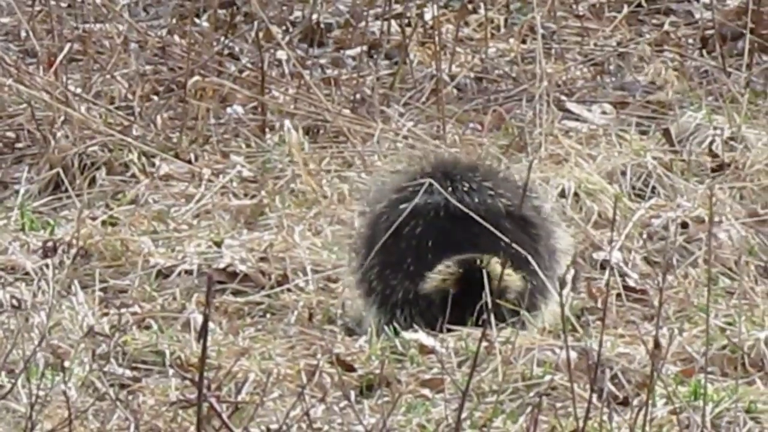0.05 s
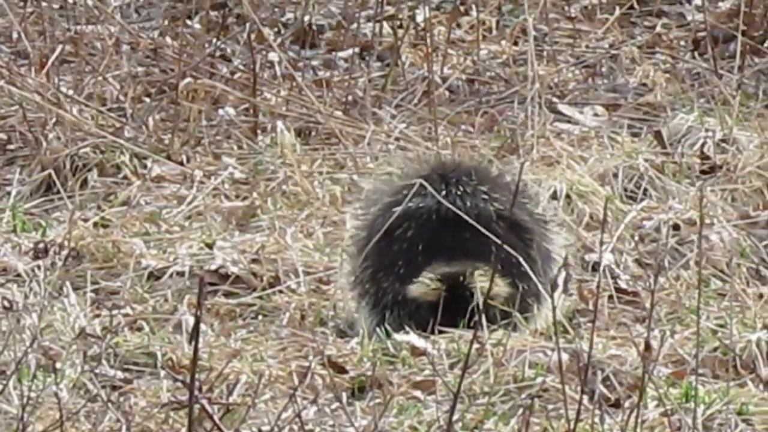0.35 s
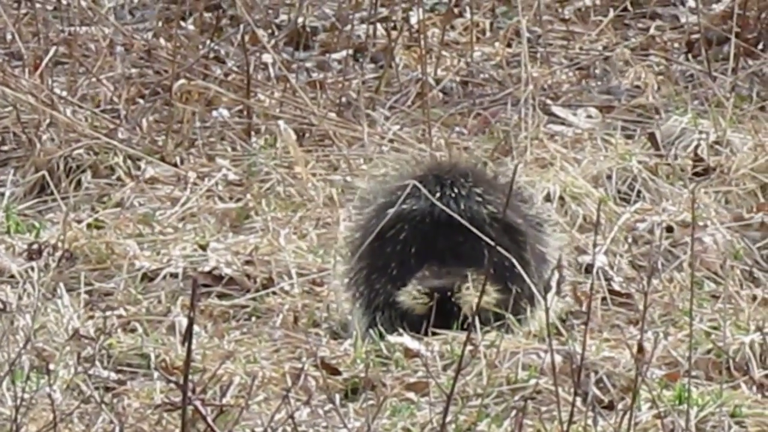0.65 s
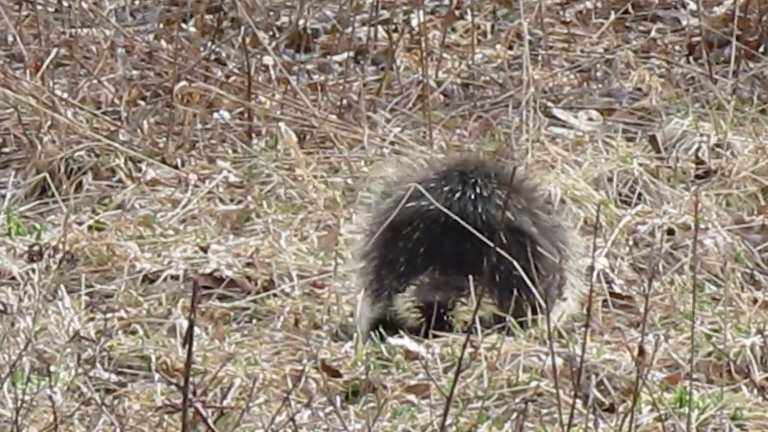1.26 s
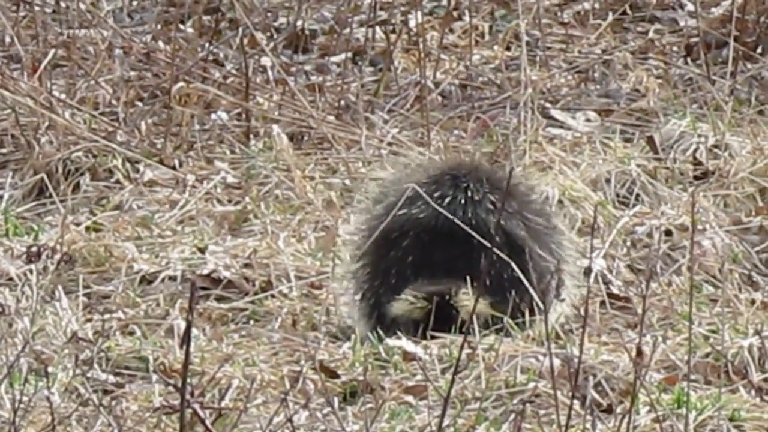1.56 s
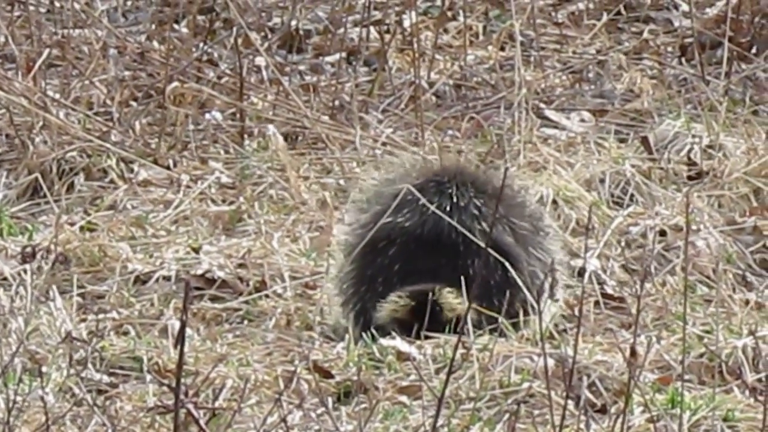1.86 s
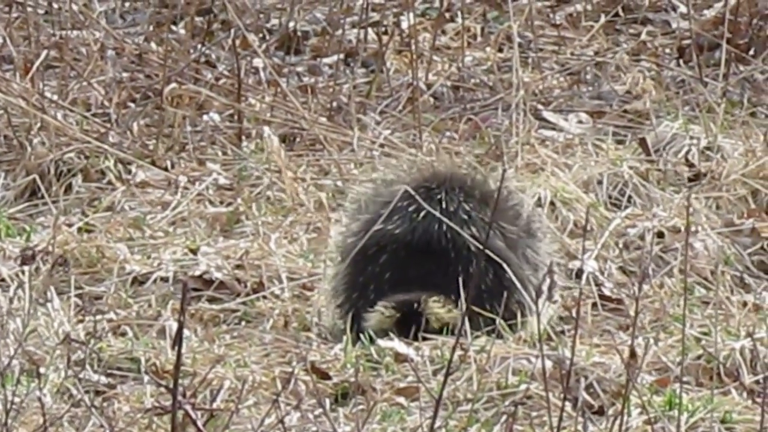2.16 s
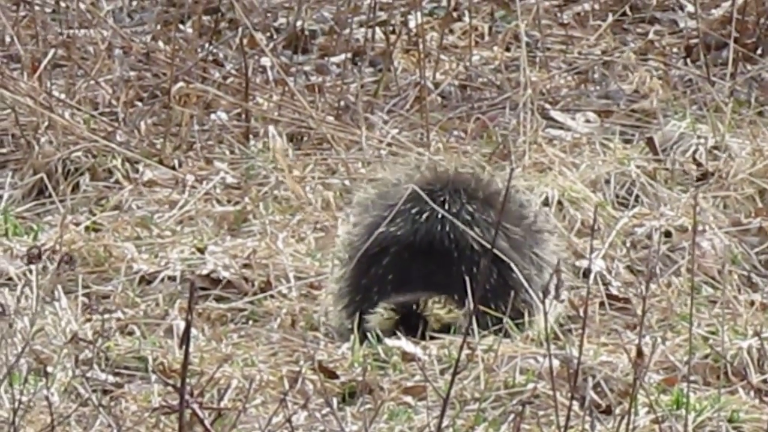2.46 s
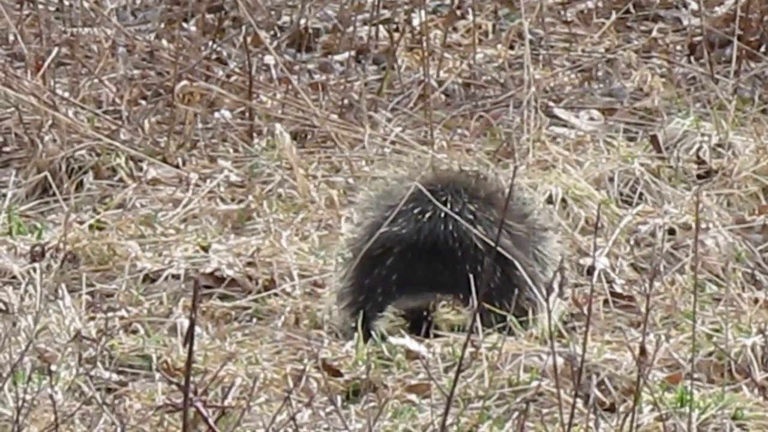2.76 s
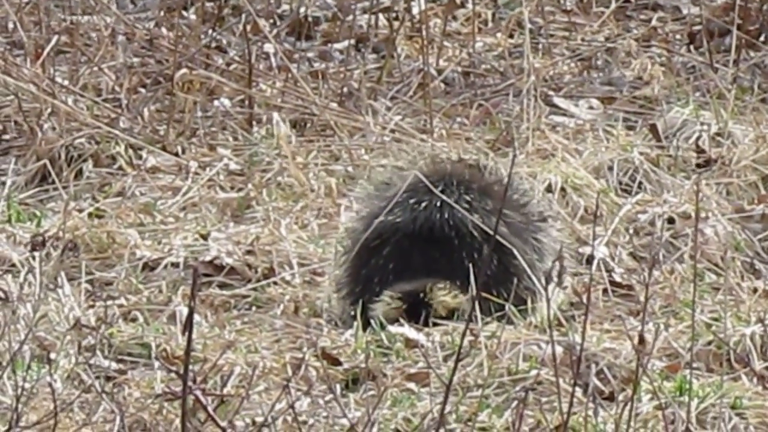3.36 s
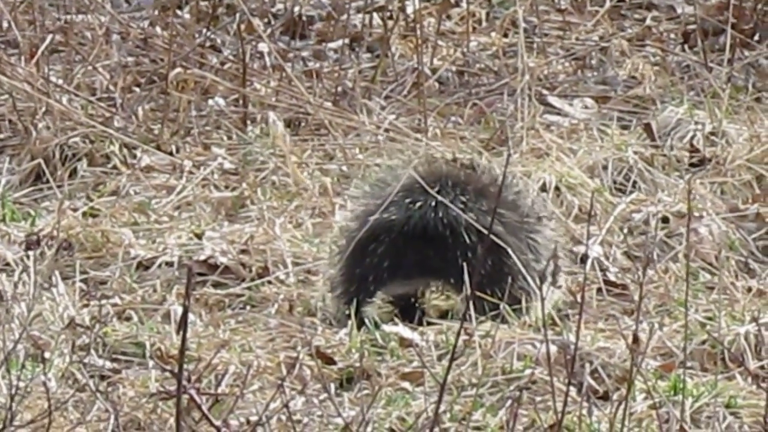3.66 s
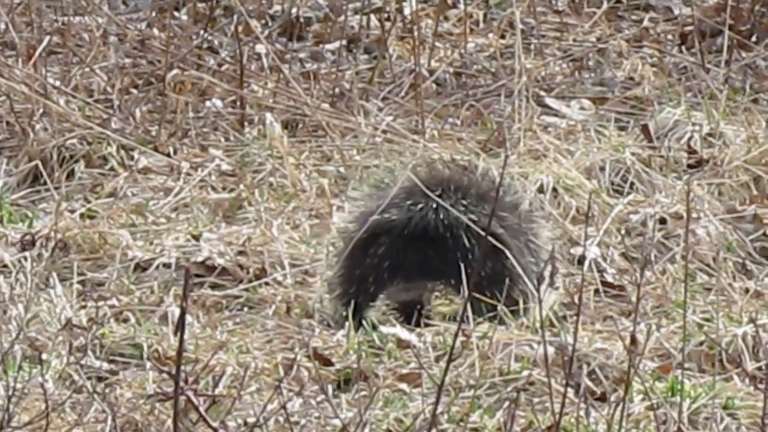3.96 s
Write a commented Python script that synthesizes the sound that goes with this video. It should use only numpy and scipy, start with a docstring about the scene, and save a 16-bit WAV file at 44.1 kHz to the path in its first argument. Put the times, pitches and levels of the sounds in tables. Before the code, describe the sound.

Thin, high bird chips repeat steadily outdoors, with soft hiss and a late low wind rumble.

```python
"""Bird chips in a dry spring meadow

A small bird gives six thin chips, each a fast downward whistle that echoes off trunks and scatters
in the brush and the wood. Behind it, far frog peeps merge into a shimmering band, a distant engine
drones and the air hisses softly; dry grass ticks as stalks snap. In the last third a breeze rises,
and its turbulent pressure buffets the two ports of the microphone."""
import sys
import numpy as np
from scipy import signal
from scipy.fft import rfft, irfft
from scipy.io import wavfile

SR = 44100
rng = np.random.default_rng(int(sys.argv[2]) if len(sys.argv) > 2 else 0)


def pcm_store(signal):
    """Save signal as 16-bit PCM."""
    levels = np.round(np.clip(np.atleast_2d(signal), -1, 1) * 32767)
    wavfile.write(sys.argv[1], SR, levels.astype(np.int16).T)


N = 176400
T = np.arange(N) / SR
FREQS = np.maximum(np.fft.rfftfreq(N, 1 / SR), 1)


def from_db(db):
    """Amplitude ratio: tenfold for every 20 dB."""
    return 10 ** (np.asarray(db) / 20)


def unit_rms(x):
    """Normalisation to unit mean power."""
    return x / np.sqrt(np.mean(x ** 2) + 1e-20)


def pan(db):
    """Interaural level difference: two gains, the left one db above the right."""
    return from_db(np.array([[db], [-db]]) / 2)


def in_time(rows, t=T):
    """Linear interpolation of each column against the times in the first."""
    times, *columns = np.transpose(rows)
    return [np.interp(t, times, column) for column in columns]


def spectrum(points):
    """Linear interpolation on a logarithmic frequency axis."""
    hz, value = np.transpose(points)
    return np.interp(np.log(FREQS), np.log(hz), value)


def coloured_noise(colour, coherence=0):
    """Partly coherent stereo noise of unit power: a common part plus an antiphase part."""
    mid, side = rfft(rng.standard_normal((2, N))) * from_db(spectrum(colour))
    stereo = np.sqrt(1 + coherence) * mid + np.sqrt(1 - coherence) * side * [[1], [-1]]
    return unit_rms(irfft(stereo, N))


def drift(corner_hz):
    """Slow random fluctuation: low-passed noise of unit power."""
    return unit_rms(irfft(rfft(rng.standard_normal(N)) / (1 + (FREQS / corner_hz) ** 2), N))


def resonance(x, hz, width_hz):
    """A damped two-pole resonator with unit gain at its peak."""
    radius = np.exp(-np.pi * width_hz / SR)
    feedforward = np.array([1, 0, -1]) * (1 - radius ** 2) / 2
    feedback = [1, -2 * radius * np.cos(2 * np.pi * hz / SR), radius ** 2]
    return signal.lfilter(feedforward, feedback, x + 1e-18)


# Still air. Each row: frequency in Hz, relative spectral density in dB.
AIR_COLOUR = [(20, 12), (45, 16), (110, 16), (190, 13.5), (300, 7.5), (450, 6), (560, 3.5), (660, 4),
              (780, 1), (1300, -1), (2100, -6.5), (3800, -8.5), (5200, -8.5), (6400, -9), (7800, -10),
              (10000, -12), (12500, -16), (15500, -22)]
# Likeness of the air at the two ears. Each row: frequency in Hz, correlation from -1 to 1.
AIR_COHERENCE = [(30, 0.54), (150, 0.78), (500, 0.49), (1200, 0.17), (4000, 0.33), (8000, -0.14),
                 (14000, -0.2)]

def air():
    """Stationary noise: broadband hiss and rumble, with a faint narrowband whir on the right."""
    out = from_db(-50.5) * coloured_noise(AIR_COLOUR, spectrum(AIR_COHERENCE))
    whir = resonance(rng.standard_normal(N), hz=1318, width_hz=46)
    out[1] += from_db(-71) * unit_rms(whir)
    return out


# The engine's fundamental. Each row: time in seconds, level in dB.
ENGINE_LEVEL = [(0, -56), (.7, -52.5), (1.0, -58.5), (1.25, -47), (1.55, -54), (1.8, -49), (2.0, -51),
                (2.25, -46), (2.7, -43.5), (4, -58)]
# Its overtones. Each row: harmonic number, mean level in dB.
ENGINE_OVERTONES = [(2, -59), (3, -70.5)]

def engine(fundamental_hz=72, waver=.01):
    """A harmonic series: three partials of a far drone waver together in pitch and fade separately."""
    hz = fundamental_hz * (1 + waver * drift(3.24))
    phase = 2 * np.pi * np.cumsum(hz) / SR
    level_db, = in_time(ENGINE_LEVEL)
    overtones = sum(from_db(db + 2 * drift(2.4)) * np.sin(k * phase) for k, db in ENGINE_OVERTONES)
    return from_db(level_db) * np.sin(phase) + overtones


# The blur of the chorus. Each row: frequency in Hz, relative spectral density in dB.
CHORUS_WASH = [(1500, -61), (2350, -6), (2580, 6.5), (2880, 2.5), (3150, -4), (4500, -26)]
# Its swells. Each row: time in seconds, level in dB, taken relative to the curve's mean.
CHORUS_SWELL = [(0, -62), (.3, -63.5), (.58, -63.5), (.72, -60), (.97, -63.5), (1.27, -61.5), (1.6, -63),
                (2.5, -63.5), (2.9, -62), (3.15, -63.5), (3.58, -60.3), (3.8, -62.5), (4, -63)]

def frogs(peeps_per_s=140, peep_s=.12, centre_hz=2735, spread_hz=190, rise_hz=170):
    """Incoherent superposition: far, rising peeps and a wash of noise merge into a shimmering band."""
    out = np.zeros((2, N + SR))
    length = int(peep_s * SR)
    progress = T[:length] / peep_s
    envelope = np.sin(np.pi * progress)
    count = int(peeps_per_s * (N / SR + peep_s))
    for when, pitch, gain, left_phase, right_phase in rng.random((count, 5)):
        hz = centre_hz + spread_hz * (2 * pitch - 1) + rise_hz * (progress - .5)
        cycles = np.cumsum(hz) / SR + [[left_phase], [right_phase]]
        start = int(when * (N + length))
        out[:, start:start + length] += gain * envelope * np.sin(2 * np.pi * cycles)
    chorus = unit_rms(out[:, length:length + N]) + from_db(1) * coloured_noise(CHORUS_WASH)
    swell_db, = in_time(CHORUS_SWELL)
    return from_db(-61.5 + swell_db - swell_db.mean()) * pan(-7.5) * unit_rms(chorus)


# Snapping stalks. Each row: start in seconds, peak level in dB, centre frequency in Hz.
SNAPS = [(.121, -50, 8900), (.309, -51, 4000), (0.386, -44.5, 3570), (1.106, -48, 8300), (1.131, -55, 9000),
         (1.176, -55, 12000), (1.22, -48.5, 9300), (3.309, -57, 11500), (3.696, -50, 7400),
         (3.909, -46, 3240)]

def grass(decay_s=.005, relative_width=.35):
    """Impulsive excitation: each dry stalk snaps in a grainy burst that drives a broad resonance."""
    out = np.zeros(N)
    for start, db, hz in SNAPS:
        grains = rng.standard_normal(N) ** 3  # cubing makes the noise spiky
        burst = grains * (T >= start) * np.exp(-np.abs(T - start) / decay_s)
        snap = resonance(burst, hz, relative_width * hz)
        out += from_db(db) * snap / np.abs(snap).max()
    return out


# The breeze on the microphone. Each row: time in seconds, left level in dB, right level in dB.
BREEZE_LEVEL = [(0, -93, -67), (2.55, -62, -68), (2.72, -38.5, -50), (2.93, -42.5, -45.5),
                (3.2, -39.5, -42), (3.38, -45, -43), (3.6, -38.5, -42), (3.72, -40, -27),
                (3.87, -38, -32.5), (4, -43, -36.5)]
# Its rumble. Each row: frequency in Hz, relative spectral density in dB.
BREEZE_COLOUR = [(15, -5), (35, -7), (80, -3), (130, -13.5), (220, -27), (400, -33), (900, -52),
                 (3000, -87)]
# Single eddies. Each row: centre time in seconds, peak of the swing at the stronger port in dB,
# swing rate in Hz, left minus right level in dB.
EDDIES = [(2.695, -21.5, 59, 31), (2.772, -30, 98, 27), (3.176, -20.5, 65, 11), (3.282, -24.5, 43.6, 20),
          (3.476, -26, 35, -9), (3.576, -28, 44, 30), (3.676, -18, 70, -38), (3.751, -18.5, 65, -34),
          (3.838, -20.5, 83.4, -34), (3.848, -22.5, 60.6, 20), (3.952, -19, 66.6, 20),
          (3.99, -29, 40.3, -18)]
# Fine turbulence around an eddy. Each row: frequency in Hz, relative spectral density in dB.
EDDY_COLOUR = [(30, -7), (90, 4.5), (180, -1.5), (300, -3.5), (450, -20), (900, -55), (3000, -85)]

def wind(rough_db=-16.5, rough_s=.0097, falloff=2.47):
    """Turbulent pressure: an independent rumble at each port, and eddies that swing it down, then up."""
    out = from_db(in_time(BREEZE_LEVEL)) * coloured_noise(BREEZE_COLOUR)
    roughness = from_db(rough_db) * coloured_noise(EDDY_COLOUR)
    for centre, db, hz, side_db in EDDIES:
        phase = 2 * np.pi * hz * (T - centre)
        swing = phase / (1 + phase ** 2 / 2) ** falloff  # a lower falloff gives longer skirts
        eddy = swing / swing.max() + roughness * np.exp(-np.abs(T - centre) / rough_s)
        out += from_db(db) * eddy * pan(side_db) / pan(side_db).max()
    return out


def scatter(x, t60_s, gain_db, colour):
    """Diffuse reverberation: countless small reflections decay exponentially, differently at each ear."""
    t = T[:SR // 2]
    tail = rng.standard_normal((2, len(t))) * from_db(-60 * t / t60_s)
    response = unit_rms(tail) / np.sqrt(len(t))  # unit energy
    scattered = signal.fftconvolve(x[None], response, axes=1)[:, :N]
    return irfft(rfft(scattered) * from_db(gain_db + spectrum(colour)), N)


# The bird at the two ports. Each row: frequency in Hz, phase lead of left over right in radians.
PORT_LEAD = [(3600, -.5), (4500, .6), (5400, .75), (6400, 1.0), (7500, 2.1), (8850, 2.35), (10300, 2.2)]
# Scatter from fine twigs near the bird. Each row: frequency in Hz, relative gain in dB.
BRUSH_COLOUR = [(3000, 4), (5400, 5.5), (7500, 2), (11000, -14)]
# Echoes off trunks. Each row: delay in seconds, left and right gains in dB, low-pass cutoff in Hz.
TRUNK_ECHOES = [(.0112, -17, -14, 11000), (.0332, -16, -22, 6000)]
# Modes of the microphone housing. Each row: frequency and width in Hz, left and right gains in dB.
HOUSING_MODES = [(3770, 120, -3, -3), (4850, 160, -1, 1), (5550, 160, 4, 0), (7600, 400, -14, -4),
                 (8700, 220, 0, -3), (9220, 130, -1, -5)]
# Scatter from the edge of the wood. Each row: frequency in Hz, relative gain in dB.
WOOD_COLOUR = [(3000, 12), (4300, 10), (5250, 7.5), (6300, 9), (9000, -3.5), (12000, 2)]

def meadow(to_listener, to_wood):
    """Multipath propagation: direct sound and near reflections ring the housing; the wood reverberates."""
    port_shift = np.exp(.5j * spectrum(PORT_LEAD) * [[1], [-1]])
    direct = irfft(rfft(to_listener) * port_shift, N)
    out = direct + scatter(to_listener, t60_s=.15, gain_db=-9, colour=BRUSH_COLOUR)
    for delay, left_db, right_db, cutoff_hz in TRUNK_ECHOES:
        dulled = signal.sosfilt(signal.butter(2, cutoff_hz, fs=SR, output="sos"), direct)
        echo = np.pad(dulled, ((0, 0), (int(delay * SR), 0)))[:, :N]
        out += from_db([[left_db], [right_db]]) * echo
    out += sum(from_db([[left_db], [right_db]]) * resonance(out, hz, width_hz)
               for hz, width_hz, left_db, right_db in HOUSING_MODES)
    return out + scatter(to_wood, t60_s=.57, gain_db=-8.5, colour=WOOD_COLOUR)


# The fall shared by all chips. Each row: time from the lower swell in seconds before stretching,
# pitch in Hz, relative level in dB.
SWEEP = [(-.022, 11900, -13), (-.0165, 10150, -7), (-.0098, 8700, -2), (-.0048, 7400, -5),
         (-.003, 6450, -13), (-.0014, 5650, -1), (.0026, 4500, -8), (.006, 3700, -11), (.009, 3150, -21)]
# The chips. Each row: time of the lower swell in seconds, gains of the lower and upper swells in dB,
# time stretch factor, onset pitch in Hz, gain towards the wood in dB as the bird turns.
CHIPS = [(.045, -48.5, -50.5, 1, 11000, 8), (.7722, -42, -42.5, 0.92, 10870, -3),
         (1.516, -40.5, -41, 0.94, 11690, -2.5), (2.2337, -41, -40, 0.87, 10000, -1),
         (2.8775, -38, -47, 0.85, 10200, -3.5), (3.5342, -45, -46.5, .92, 10500, 4)]

def bird(fade_s=.00074, onset_span_hz=696):
    """Frequency modulation: each chip is a pure tone that plunges nearly two octaves and swells twice."""
    to_listener, to_wood = np.zeros((2, N))
    for when, lower_db, upper_db, stretch, onset_hz, wood_db in CHIPS:
        t = (T - when) / stretch
        from_edge = np.minimum(t - SWEEP[0][0], SWEEP[-1][0] - t)
        sounding = from_edge > 0
        hz, sweep_db = in_time(SWEEP, t[sounding])
        swell_db = np.interp(hz, [5800, 8500], [lower_db, upper_db])
        edge_fade = np.minimum(from_edge[sounding] / fade_s, 1)
        onset = np.clip((onset_hz - hz) / onset_span_hz + .5, 0, 1)  # opens as the pitch falls
        envelope = from_db(sweep_db + swell_db) * edge_fade * onset
        chip = envelope * np.sin(2 * np.pi * np.cumsum(hz) / SR)
        to_listener[sounding] += chip
        to_wood[sounding] += from_db(wood_db) * chip
    return to_listener, to_wood


def scene():
    """Linear superposition: the bird and its reflections add to the other sounds of the meadow."""
    return air() + meadow(*bird()) + engine() + wind() + grass() + frogs()


def record(dry):
    """Band limiting: a very steep low-pass removes the highest treble."""
    cutoff_hz = 15700
    return irfft(rfft(dry) / np.sqrt(1 + (FREQS / cutoff_hz) ** 400), N)


dry = scene()
out = record(dry)
pcm_store(out)
```